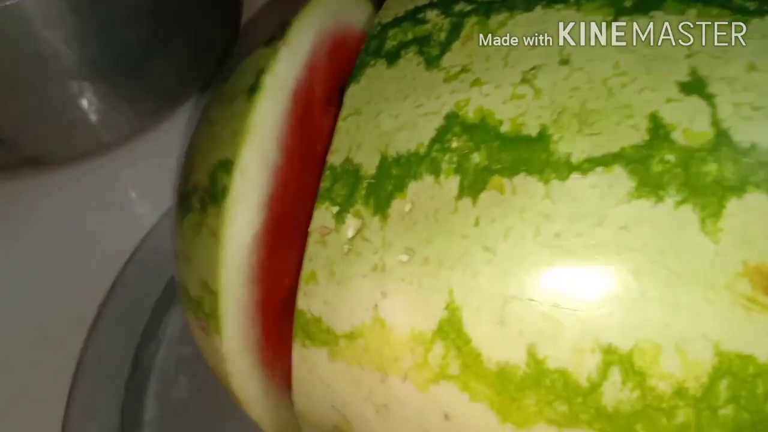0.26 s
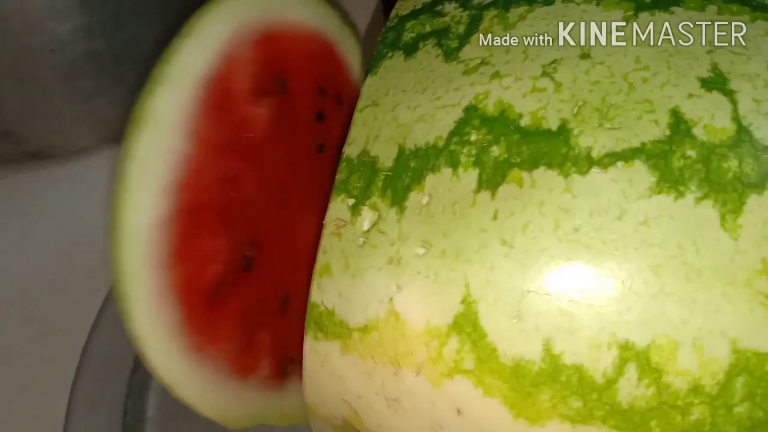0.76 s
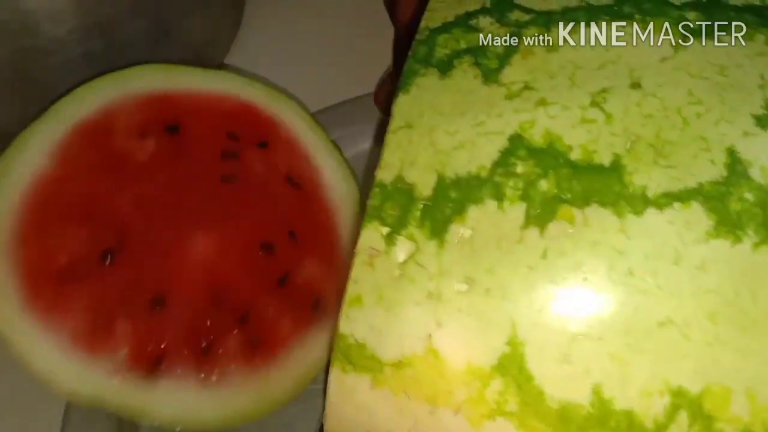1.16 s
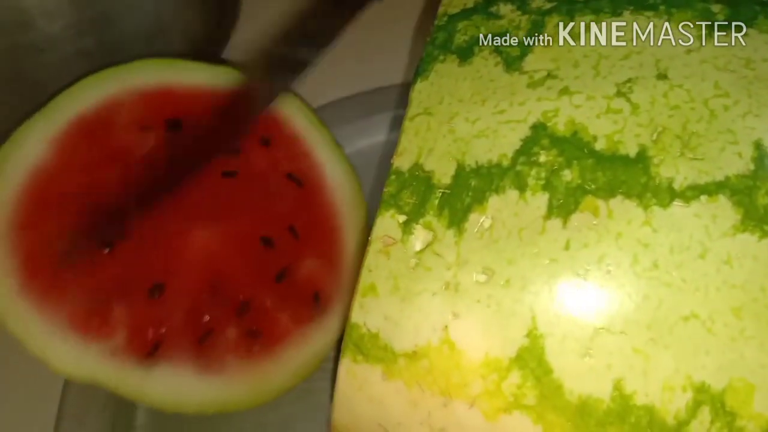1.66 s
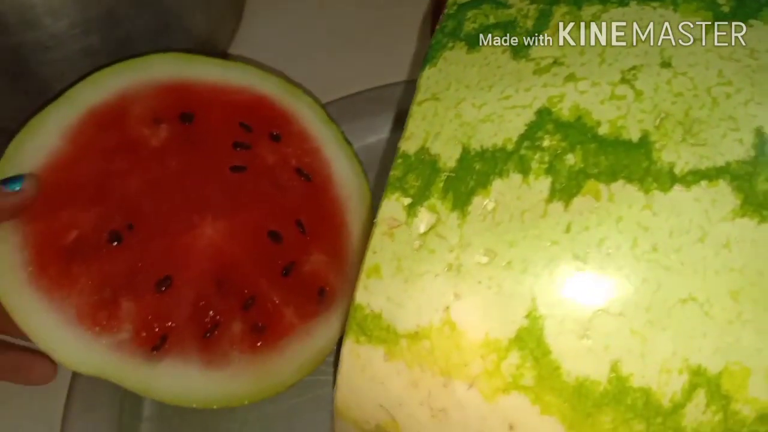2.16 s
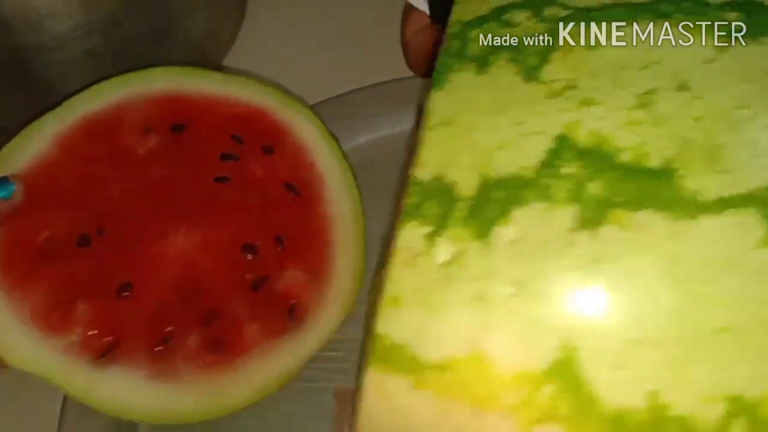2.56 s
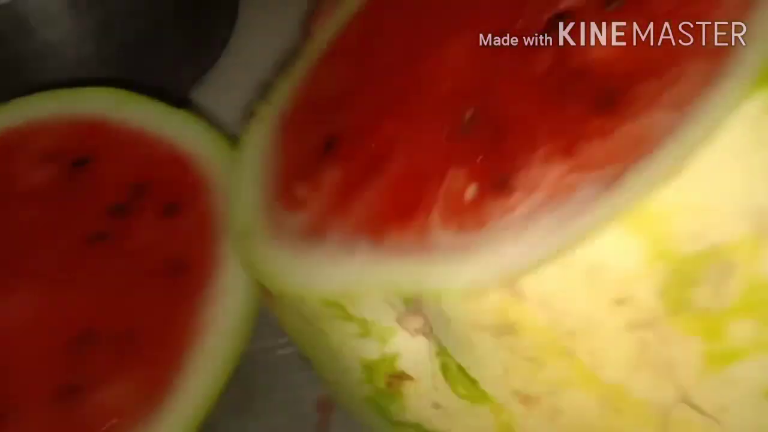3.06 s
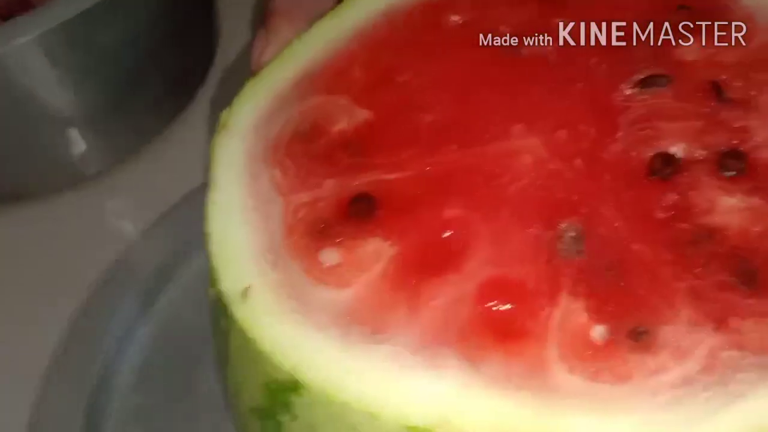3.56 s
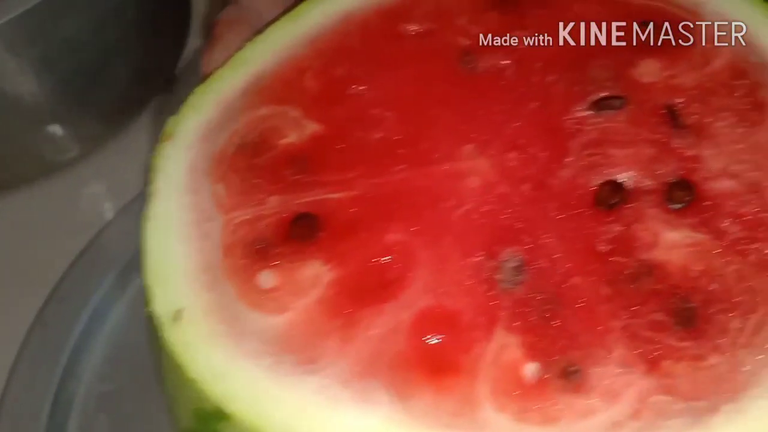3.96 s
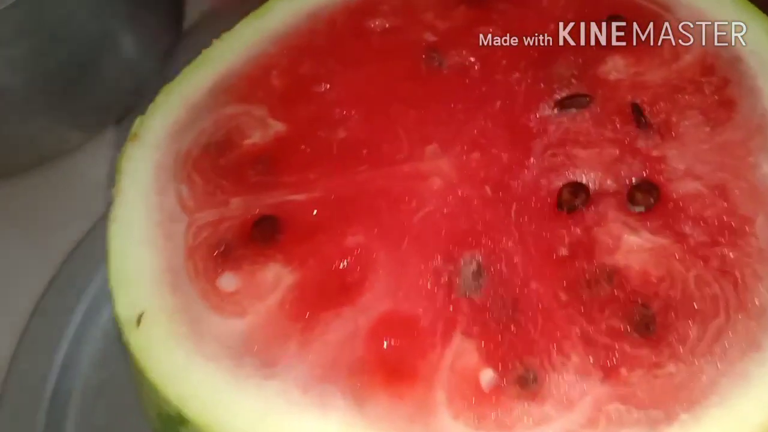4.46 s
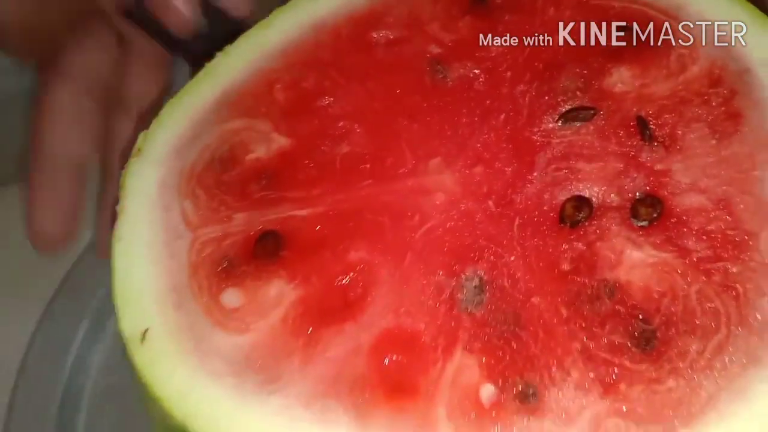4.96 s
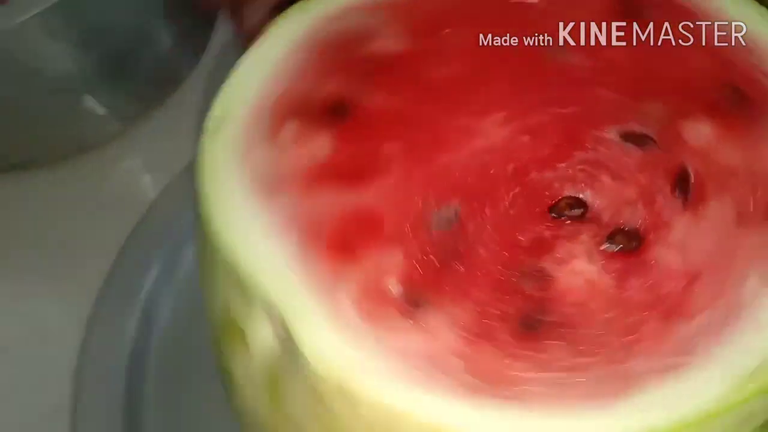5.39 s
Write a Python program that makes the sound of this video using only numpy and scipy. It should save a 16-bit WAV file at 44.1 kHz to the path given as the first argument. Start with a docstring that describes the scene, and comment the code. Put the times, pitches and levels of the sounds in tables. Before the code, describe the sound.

A close phone view of a watermelon on a steel tray in a small reflective kitchen, with low room air beneath. From 0 to 0.9 s hands rub the wet rind with faint squeaks and squelches while fibres part in crisp, juicy snaps, in bursts around 0.2 s and from 0.55 to 0.9 s. At about 0.95 s the slice topples onto the tray, the hardest clank at 1.02 s with a short thud. Soft rubbing, weak taps near 1.4 s and a faint hiss follow. From about 2.15 to 2.95 s the melon slides with a strong nasal rasp near 2 kHz, fading while growing grittier as it tips. Between 3.43 and 3.71 s the tray clatters in quick knocks with a dull, hollow bump. Afterwards it is quiet: light rubs, tiny squeaks, two faint hum swells around 4.3 and 4.8 s, and delicate taps at 5.0 and 5.4 to 5.6 s.

```python
"""Hands rub a wet watermelon while fibres snap; a slice peels off and topples onto a steel tray.
A faint hiss near 2 kHz lingers, then the melon slides with a rasp and tips onto its edge; the tray clatters.
Rubs, squeaks and two swells of a faint hum follow, then a few light taps; a phone listens from close by.
Fibres, rubs and rasp are shaped noise; a knock is noise, damped modes and a thud, with a diffuse kitchen tail."""
import sys
import numpy as np
from scipy import signal
from scipy.fft import rfft, irfft, next_fast_len
from scipy.io import wavfile
from scipy.ndimage import uniform_filter1d, map_coordinates

SR = 44100
rng = np.random.default_rng(int(sys.argv[2]) if len(sys.argv) > 2 else 0)


def int16_out(signal):
    """Quantize to a 16-bit WAV file."""
    q = np.round(np.clip(np.atleast_2d(signal).T, -1, 1) * 32767)
    wavfile.write(sys.argv[1], SR, q.astype(np.int16))


N = 248283

# Levels are relative unless stated.
# still air: f/Hz, level/dB
AIR_SPECTRUM = [(12, 3), (20, 15.5), (30, -16.5), (49, -10), (130, -7), (285, -12.5), (328, -13),
                (642, -12), (1260, -19), (2600, -16.5), (3440, -24.5), (5230, -21.5), (9950, -66),
                (13500, -35), (16000, -59)]
# faint wavering hum: start/s, end/s, f/Hz, level/dB (f and level are centres)
HUM_SWELLS = [(4.278, 4.417, 637, -62), (4.693, 4.857, 633, -59)]
# decay of the hard-walled kitchen: f/Hz, t60/s
KITCHEN_DECAY = [(100, 0.36), (400, 0.52), (1200, 0.37), (2500, 0.47), (5000, 0.41), (9000, 0.37),
                 (15000, 0.24)]
# likeness of left and right: f/Hz, correlation (1 = alike)
PORT_LIKENESS = [(60, 0.94), (250, 0.93), (600, 0.46), (1500, 0.057), (6000, 0.12)]
# level difference of the phone's ports: f/Hz, left minus right/dB
PORT_BALANCE = [(100, 1), (400, 1), (1250, 1), (2400, 3.5), (4400, 3.5), (8100, 8), (15000, 1)]
# place of tray and drag sounds, interpolated: t/s, left delay/ms, left minus right/dB
PLACES = [(1.4, .3, 0), (3.4, 0.077, -0.5)]
LOW_CUT_HZ, TOP_HZ = 47, 15900

# hands rub the rind: start/s, end/s, level/dB, hiss against it/dB
HAND_RUBS = [(0.037, 0.233, -62.5, -13.5), (0.402, 0.615, -60, -17), (0.818, .95, -63, -16),
             (1.262, 1.422, -49.5, -3), (2.963, 3.176, -59, -42), (3.287, 3.443, -62.5, -25),
             (3.85, 3.957, -69.5, -5.5), (4.153, 4.285, -61.5, -10), (4.381, 4.722, -72.5, -5.5),
             (4.835, 4.945, -65.5, -7), (5.09, 5.62, -66.5, -5.5)]
# dry rustle, wet squish, treble hiss: f/Hz, level/dB
RUB_SPECTRUM = [(350, -29), (600, -3), (636, -21.5), (675, -3), (887, -3), (948, -3), (1040, -5.5),
                (1220, 0), (1430, -7), (2220, 2), (3500, -8), (4550, -45), (7700, -120)]
SQUISH_SPECTRUM = [(2500, -47.5), (3600, -2.5), (5000, -1.5), (6500, -5.5), (8500, -18)]
HISS_SPECTRUM = [(6000, -6), (8200, 3), (10000, -6.5), (12000, -1), (14500, 0.5), (15600, -22)]
# the fruit's weight shifts on the tray: start/s, end/s, level/dB
WEIGHT_SHIFTS = [(0, 0.237, -61), (0.698, 1.617, -66), (2.966, 3.552, -60), (4.444, 4.9, -68.5)]
RUB_ATTACK_S, RUB_RELEASE_S = 0.15, 0.1566
RUB_DB, SQUISH_DB = 6, 0.5  # dry and wet part, against the press
# faint steady treble hiss while the slice lands and after
HISS_START_S, HISS_END_S, HISS_LOWER_DB, HISS_UPPER_DB = 0.81, 2.024, -57, -59

# soft bumps of the heavy fruit: t/s, level/dB, f/Hz, t60/s
FRUIT_BUMPS = [(1.186, -47, 313, 0.2), (3.3, -49, 115, 0.27), (3.426, -43, 227, 0.12),
               (3.635, -34, 349, 0.34), (5.095, -43.5, 229, 0.068), (5.41, -49, 408, 0.3)]
# slips of wet rind: t/s, length/s, f/Hz, width as a fraction of f, level/dB
RIND_SQUEAKS = [(0.033, 0.062, 1180, 0.017, -55.5), (0.034, 0.066, 2400, 0.7, -54.5),
                (0.272, 0.051, 2670, 1, -52.5), (0.356, 0.041, 2460, 0.63, -55),
                (.395, 0.063, 2640, 1, -50), (0.485, 0.029, 1410, 0.19, -53.5),
                (0.558, 0.052, 2070, 0.45, -48), (2.134, 0.11, 920, 0.075, -52.5),
                (4.128, 0.12, 976, 0.013, -66), (4.404, .08, 574, .07, -64.5),
                (4.499, 0.26, 433, 0.066, -62.5)]

# faint hiss near 2 kHz, then the slide: start/s, end/s, level at start/dB, sag/(dB/s), first f/Hz, last f/Hz
DRAG_PUSHES = [(1.45, 2.06, -55.5, 5, 2220, 2060), (2.245, 2.87, -33, 12, 1953, 2123)]
# rasp resonances, lower and upper: multiple of the centre f, width/Hz, level/dB
RASP_LOWER = [(1, 274, 18), (1.22, 420, 11.5), (1.55, 240, -17)]
RASP_UPPER = [(2.09, 530, -9), (2.28, 516, -7), (3.15, 402, -22.5)]
# rind grit; scrape of the loaded sheet: f/Hz, level/dB
GRIT_SPECTRUM = [(3060, -16), (5200, 6.5), (5960, -2), (8480, -7.5), (9720, -15), (13700, -11),
                 (15600, -22), (16000, -69.5)]
SCRAPE_SPECTRUM = [(250, -22), (420, -3.5), (620, -6.5), (850, -12.5), (1100, -6.5), (1320, -2),
                   (1480, -7.5), (1800, -9.5), (2300, -32)]
DRAG_ATTACK_S, DRAG_RELEASE_S = 0.13, 0.11
WAVER_HZ = 61  # wander of the resonances with the grip, before smoothing
UPPER_DB, GRIT_DB, SCRAPE_DB = -9, -20, -20.5  # against the lower rasp, melon flat
LOAD_WIDTH_HZ = 22  # widening of the sheet's resonances under the sliding fruit
TIP_S, TIPPING_S = 2.492, 0.12  # midpoint and time scale of tipping onto the edge
TIP_UPPER_DB, TIP_GRIT_DB, TIP_SCRAPE_DB = 1.5, 11.5, 13.5  # added by tipping

# thickest wet fibres snap: t/s, level/dB, body/dB
THICK_SNAPS = [(.154, -31, 0), (.178, -35, 11.5), (0.1835, -29.5, -8), (0.2103, -30.5, -4),
               (0.226, -31.5, -5), (.5622, -35, -1), (.586, -32.5, -12), (0.6019, -31.5, 5),
               (0.6395, -32.5, 5.5), (0.7558, -28.5, 4.5), (0.7831, -23, -28.5), (0.7985, -32, -8),
               (0.8079, -27.5, -7), (0.8453, -25, -4.5), (0.8637, -30.5, -4), (0.8854, -30, -1),
               (.895, -28.5, -15.5)]
# thin fibres part at random: start/s, end/s, median level/dB
THIN_PULLS = [(0.111, .23, -48), (.57, .64, -33), (0.848, 0.938, -32.5)]
# bright tick and dull flesh pop of a fibre: f/Hz, level/dB
WET_SPECTRUM = [(1470, -16.5), (2500, -6), (2790, -12), (3860, -14.5), (5230, -5.5), (6500, -20),
                (10700, -27), (13800, -23.5), (16000, -30)]
FLESH_SPECTRUM = [(300, -25), (700, -4), (1100, -3.5), (2400, -2.5), (3500, -9), (5000, -31.5)]
FIBRES_PER_S, FIBRE_SCATTER_DB, FIBRE_BODY_DB = 46, 4.5, 2.5

# knocks on the tray: t/s, level/dB, treble/dB, rim ring/dB
TRAY_KNOCKS = [(0.9442, -31.5, -24, -18), (0.9527, -12, -3, -27), (0.9722, -15.5, 5, -26),
               (1.008, -33, 13, -5), (1.018, 3, 0.5, -17), (1.191, -37, -18, -35), (1.357, -34, -13, -17),
               (1.388, -33.5, -9, -16), (1.418, -33.5, 10, -16), (3.428, -42, -27.5, -28),
               (3.4449, -14, -1.5, -32), (3.4569, -8.5, -8, -37), (3.578, -6, -7.5, -28.5),
               (3.633, -12, -1, -24), (3.6452, -12.5, 5.5, -32), (3.6748, -14, -2.5, -30),
               (3.687, -16.5, -10.5, -35), (3.71, -35, -13.5, -25), (4.9712, -50, -2, -24),
               (5.4093, -37.5, 1.5, -30), (5.555, -49, 3, -7), (5.6127, -41.5, 10, 15.5),
               (5.625, -37.5, -12, 14)]
# loaded sheet: f/Hz, width/Hz, level/dB
SHEET_MODES = [(728.4, 22, -9.5), (931, 17, -5), (1139, 16, 6), (1279, 7.4, -7.5), (1323, 14, -14),
               (1485, 40, 4.5), (1600, 80, 7.5), (1920, 77, -6), (1980, 55, -5), (2095, 32, 6),
               (2287, 77, 5), (2412, 48, 4), (2695, 17, -15.5), (2925, 17, -16.5), (2780, 12, 9.5),
               (3125, 23, -1), (4116, 190, -11.5), (4000, 93, -21.5), (4980, 39, -9.5), (5040, 40, -7.5),
               (5800, 68, -8.5), (6100, 33, -9)]
# free rim: f/Hz, level/dB, t60/s before the fruit's damping
RIM_MODES = [(1015, -14.5, 0.54), (1198, -3, 0.13), (1260, -10.5, 0.39), (2010, -20.5, 0.46),
             (2090, -2, 0.24), (2288, -16, 0.42), (2820, -5, 0.33), (2657, 4, 0.6), (2695, -13.5, 0.26),
             (2675, 0.5, 0.24), (3100, -7.5, 0.43), (4170, -8.5, .26), (4490, -17.5, 0.61),
             (4550, -16, .42), (5150, -17.5, 0.44), (5185, -16.5, .4)]
# dense clatter: f/Hz, level/dB
CLANG_SPECTRUM = [(250, -49.5), (420, -32.5), (727, -7.5), (846, -9), (927, -6.5), (1220, -1.5),
                  (1760, -3.5), (2350, -2), (3140, -8), (3330, -14), (5030, -10), (9680, -31.5),
                  (14200, -29), (16000, -51)]
# counter: f/Hz, level/dB, t60/s before the flesh's damping
COUNTER_MODES = [(81.5, -6.5, 0.075), (120, -5, 0.062), (155, -7.5, 0.044)]
# the fruit's hollow body: f/Hz, level/dB
HOLLOW_SPECTRUM = [(120, -26), (200, -1.5), (260, -3.5), (340, -1.5), (430, -4), (700, -29)]
REBOUND_S, REBOUND_DB, REBOUND_TREBLE_DB = .0044, -5.5, -1.5  # second contact, against the first
CLATTER_T60_S, CLATTER_DOUBLES_DB = 0.068, 38  # t60 at 0 dB; doubles for a knock this much softer
SLICE_DOWN_S = 1.25  # knocks before: slice landing; after: melon rocking the tray and light taps
SLICE_THUD_DB, LATER_THUD_DB = -10.5, -32  # for a 0 dB knock, before the port split
THUD_DB_PER_DB, THUD_DAMPING_T60_S = 1.6, 0.088  # growth with the knock; damping by soft flesh
RIM_DAMPING_T60_S = 1.5  # added by the wet fruit
HOLLOW_DB = -33.5


def amp(db):
    """Decibels to gain."""
    return 10 ** (np.asarray(db) / 20)


def unit(x):
    """Scale to rms 1."""
    return x / np.sqrt(np.mean(x ** 2) + 1e-20)


def along(points, hz):
    """Interpolate (f/Hz, value) points on a log frequency axis."""
    f, v = np.transpose(points)
    return np.interp(np.log(hz + 1), np.log(f + 1), v)


def colour(points):
    """Gain response of a (f/Hz, level/dB) spectrum."""
    return lambda hz: amp(along(points, hz))


def wobble(knots_per_s):
    """Smooth random curve through normal knots."""
    return map_coordinates(rng.standard_normal(int(N * knots_per_s / SR) + 4),
                           [np.arange(N) * knots_per_s / SR])


def dying(t, t60):
    """Exponential decay, -60 dB after t60."""
    return np.exp(-np.log(1000) * t / t60)


def stroke(start_s, end_s, attack_s, release_s):
    """Squared ramp envelope: full from start to end, attack before, release after."""
    end_s = max(start_s, end_s)
    knots_s = [start_s - attack_s, start_s, end_s, end_s + release_s]
    return np.interp(np.arange(N) / SR, knots_s, [0, 1, 1, 0]) ** 2


def filtered(x, response):
    """Apply a response of frequency, zero-padded."""
    size = x.shape[-1]
    m = next_fast_len(size + 8192)
    return irfft(rfft(x, m) * response(np.fft.rfftfreq(m, 1 / SR)), m)[..., :size]


def noise(response, size=N):
    """Shaped stereo noise of rms 1; mid and side shares set the left-right likeness."""
    def mid_side(hz):
        angle = np.arccos(np.clip(along(PORT_LIKENESS, hz), -1, 1)) / 2
        return response(hz) * np.array([np.cos(angle), np.sin(angle)])
    mid, side = filtered(rng.standard_normal((2, size)), mid_side)
    return unit(np.array([mid + side, mid - side]))


def gliding(resonances, centre_hz):
    """Noise of rms 1 in resonances that follow a smoothed moving centre."""
    hz, t, z = signal.stft(noise(np.ones_like), SR, nperseg=512)
    centre = np.interp(t, np.arange(N) / SR, uniform_filter1d(centre_hz, size=5000))
    power = sum(amp(db) ** 2 / (1 + (2 * (hz[:, None] - multiple * centre) / width_hz) ** 2) ** 2
                for multiple, width_hz, db in resonances)
    return unit(signal.istft(z * np.sqrt(power), SR, nperseg=512)[1][:, :N])


def decaying(peaks, stretch):
    """(f, width, level) resonances as (f, level, t60) modes: narrow ones ring longer."""
    return [(hz, db + 10 * np.log10(width_hz), stretch * np.log(1000) / np.pi / width_hz)
            for hz, width_hz, db in peaks]


def ringing(modes, t, scatter_db, spread):
    """Damped modes, total power normalised, with random strengths and port phases (spread in rad)."""
    hz, db, t60 = np.transpose(modes)
    gain = amp(db + scatter_db * rng.standard_normal(len(hz)))
    common = 2 * np.pi * rng.random(len(hz))
    phases = np.exp(1j * (common + spread * rng.standard_normal((2, len(hz)))))
    waves = np.exp((2j * np.pi * hz - np.log(1000) / t60)[:, None] * t)
    return np.sqrt(2) * ((phases * gain / np.linalg.norm(gain)) @ waves).real


def add(track, s, sound):
    """Mix a sound into a track at time s."""
    start = max(round(s * SR), 0)
    part = sound[:, :max(N - start, 0)]
    track[:, start:start + part.shape[1]] += part


def placed(x, s):
    """Offset the ports in time and level by the source's place at time s."""
    times_s, lags_ms, sides_db = np.transpose(PLACES)
    lag_s = np.interp(s, times_s, lags_ms) / 1000
    side_db = np.interp(s, times_s, sides_db)
    half = np.array([[.5], [-.5]])
    return filtered(x, lambda hz: amp(half * side_db) * np.exp(-2j * np.pi * hz * half * lag_s))


def kitchen(x, wet_db, delay_s=0.0042, build_s=0.0057):
    """Hard walls answer with a fresh diffuse tail, its decay set by frequency."""
    hz, t, z = signal.stft(noise(np.ones_like, size=int(SR * .7)), SR, nperseg=256)
    decay = dying(t, along(KITCHEN_DECAY, hz)[:, None])
    tail = signal.istft(z * decay, SR, nperseg=256)[1]
    tail = tail * np.clip((np.arange(tail.shape[1]) / SR - delay_s) / build_s, 0, 1)
    answer = signal.fftconvolve(x, tail / np.linalg.norm(tail[0]), axes=1)
    return np.pad(x, ((0, 0), (0, tail.shape[1] - 1))) + amp(wet_db) * answer


def room_tone():
    """Still air as shaped noise, a low narrow-band drone and a wavering sine hum."""
    hum = 0
    for start_s, end_s, hum_hz, db in HUM_SWELLS:
        swell = amp(db + 1.5 * wobble(14)) * stroke(start_s, end_s, attack_s=0.076, release_s=0.3)
        hum = hum + swell * np.sin(2 * np.pi * np.cumsum(hum_hz + 6 * wobble(30)) / SR)
    drone = noise(lambda hz: 1 / (1 + ((hz - 132) / 7) ** 2))
    return amp(-54.5) * noise(colour(AIR_SPECTRUM)) + amp(-69) * drone + hum


def hands():
    """Fingers rustle in grains on wet rind, with a faint treble hiss; shifting weight rumbles softly."""
    pressure, rub_hiss = np.zeros(N), np.zeros(N)
    for start_s, end_s, db, hiss_db in HAND_RUBS:
        press = amp(db) * stroke(start_s, end_s, RUB_ATTACK_S, RUB_RELEASE_S)
        pressure += press
        rub_hiss += amp(hiss_db) * press
    steady = stroke(HISS_START_S, HISS_END_S, attack_s=0.201, release_s=0.18)
    squish_level = np.hypot(amp(SQUISH_DB) * pressure, amp(HISS_LOWER_DB) * steady)
    hiss_level = np.hypot(rub_hiss, amp(HISS_UPPER_DB) * steady)
    rub = amp(RUB_DB) * pressure * noise(colour(RUB_SPECTRUM))
    squish = squish_level * noise(colour(SQUISH_SPECTRUM))
    hiss = hiss_level * noise(colour(HISS_SPECTRUM))
    grain = unit(amp(1.1 * wobble(590) + 1.0 * wobble(38)))
    weight = sum(amp(db) * stroke(start_s, end_s, attack_s=0.6, release_s=0.51)
                 for start_s, end_s, db in WEIGHT_SHIFTS)
    rumble = noise(colour([(150, -18), (330, 14.0), (470, 12.0), (650, 11), (1100, -48.5)]))
    return (rub + squish + hiss) * grain + weight * rumble


def bumps():
    """Heavy fruit meets hand or tray softly: a low damped note over a dull puff."""
    out, t = np.zeros((2, N)), np.arange(SR) / SR
    for s, db, note_hz, t60 in FRUIT_BUMPS:
        note = np.sin(2 * np.pi * note_hz * t) * dying(t, t60)
        band = noise(lambda hz: 1 / (1 + ((hz - note_hz) / 70) ** 4), size=len(t))
        puff = amp(-2.5) * band * dying(t, 0.14)
        add(out, s, amp(db) * (note + puff) * (1 - np.exp(-t / 0.0042)))
    return out


def squeaks():
    """Wet rind slips briefly: narrow noise has a fuzzy pitch, broad noise is a squelch."""
    out = np.zeros((2, N))
    for s, length_s, pitch_hz, width, db in RIND_SQUEAKS:
        swell = np.hanning(int(length_s * SR))
        slip = noise(lambda hz: 1 / (1 + ((hz / pitch_hz - 1) / width) ** 2), size=len(swell))
        add(out, s, amp(db + 3.0) * swell * slip)
    return out * unit(amp(0.86 * wobble(430)))


def drag():
    """After a faint hiss, rind slips over steel in tiny jerks; resonances glide, grit grows with tipping."""
    t = np.arange(N) / SR
    push = sum(amp(db - sag_db_per_s * (t - start_s))
               * stroke(start_s, end_s, DRAG_ATTACK_S, DRAG_RELEASE_S)
               for start_s, end_s, db, sag_db_per_s, *_ in DRAG_PUSHES)
    glide_s = np.ravel([row[:2] for row in DRAG_PUSHES])
    glide_hz = np.ravel([row[-2:] for row in DRAG_PUSHES])
    centre_hz = np.interp(t, glide_s, glide_hz)
    tipped = (1 + np.tanh((t - TIP_S) / TIPPING_S)) / 2

    lower = gliding(RASP_LOWER, centre_hz + WAVER_HZ * wobble(16))
    upper = gliding(RASP_UPPER, centre_hz + WAVER_HZ * wobble(16))
    rasp = lower + amp(UPPER_DB + TIP_UPPER_DB * tipped) * upper
    grit = noise(colour(GRIT_SPECTRUM)) + amp(1.5) * noise(lambda hz: 1 / (1 + ((hz - 3250) / 350) ** 2))

    def sheet(hz):
        """Equal-height sheet resonances over a floor, widened, so more damped, by the fruit's weight."""
        return .5 + sum(1 / (1 + (2 * (hz - mode_hz) / (width_hz + LOAD_WIDTH_HZ)) ** 2)
                        for mode_hz, width_hz, _ in SHEET_MODES)
    scrape = noise(lambda hz: colour(SCRAPE_SPECTRUM)(hz) * sheet(hz))

    sound = rasp + amp(GRIT_DB + TIP_GRIT_DB * tipped) * grit
    sound = sound + amp(SCRAPE_DB + TIP_SCRAPE_DB * tipped) * scrape
    slips = unit(amp(1.17 * wobble(420) + 0.7 * wobble(90)))
    return kitchen(placed(sound * slips * push, DRAG_PUSHES[0][0]), wet_db=-2)[:, :N]


def peeling():
    """Juicy fibres part one by one: a bright tick and crack over a duller pop of flesh."""
    out, t = np.zeros((2, N)), np.arange(SR // 20) / SR
    thin = []
    for start_s, end_s, db in THIN_PULLS:
        for s in np.arange(start_s, end_s, 1 / FIBRES_PER_S):
            fibre_db = db + FIBRE_SCATTER_DB * rng.standard_normal()
            thin.append((s + rng.random() / FIBRES_PER_S, fibre_db, FIBRE_BODY_DB))
    for s, db, body_db in THICK_SNAPS + thin:
        tick = noise(colour(WET_SPECTRUM), size=len(t)) * dying(t, 0.019)
        pop = amp(body_db - 12) * noise(colour(FLESH_SPECTRUM), size=len(t)) * dying(t, 0.041)
        crack = amp(-18) * noise(np.ones_like, size=len(t)) * dying(t, 0.0041)
        add(out, s, amp(db - 2.5) * (tick + pop + crack) * (1 - np.exp(-t / 0.00016)))
    return kitchen(out, wet_db=-10.0)[:, :N]


def contact(t, db, treble_db, rim_db):
    """One touch on the tray: dense clatter, damped sheet modes, rim ring, crack and hollow fruit note."""
    def hardness(hz):
        """A harder contact lifts the top of the spectrum."""
        return colour(CLANG_SPECTRUM)(hz) * amp(treble_db * hz ** 2 / (hz ** 2 + 3500 ** 2))
    clatter_t60_s = CLATTER_T60_S * 2 ** (-db / CLATTER_DOUBLES_DB)
    clatter = amp(0.5) * noise(hardness, size=len(t)) * dying(t, clatter_t60_s)
    sheet = amp(-4) * ringing(decaying(SHEET_MODES, stretch=1), t, scatter_db=2.5, spread=.7)
    rim = amp(rim_db - 9) * ringing(RIM_MODES, t, scatter_db=2, spread=.9) * dying(t, RIM_DAMPING_T60_S)
    crack = amp(treble_db - 21) * noise(np.ones_like, size=len(t)) * dying(t, 0.011)
    hollow = amp(HOLLOW_DB) * noise(colour(HOLLOW_SPECTRUM), size=len(t)) * dying(t, 0.27)
    return amp(db) * (clatter + sheet + rim + crack + hollow) * (1 - np.exp(-t / 0.00031))


def tray():
    """Each knock is a contact, a quick softer rebound and a damped thud through the counter."""
    out, t = np.zeros((2, N)), np.arange(SR // 2) / SR
    thud = sum(amp(db) * np.sin(2 * np.pi * hz * t) * dying(t, t60) for hz, db, t60 in COUNTER_MODES)
    thud = thud * (1 - np.exp(-t / 0.0028)) * dying(t, THUD_DAMPING_T60_S)
    port_gain = amp([[6], [-12]])  # left, right
    for s, db, treble_db, rim_db in TRAY_KNOCKS:
        for k in range(2):
            blow = contact(t, db + k * REBOUND_DB, treble_db + k * REBOUND_TREBLE_DB, rim_db)
            add(out, s + k * REBOUND_S, kitchen(placed(blow, s), wet_db=-12.5))
        thud_db = SLICE_THUD_DB if s < SLICE_DOWN_S else LATER_THUD_DB
        add(out, s, amp(THUD_DB_PER_DB * db + thud_db) * port_gain * thud)
    return out


def scene():
    """Sum of all sources, the left port louder, most of all in the treble."""
    sound = room_tone() + hands() + bumps() + squeaks() + drag() + peeling() + tray()
    half = np.array([[.5], [-.5]])
    return filtered(sound, lambda hz: amp(half * along(PORT_BALANCE, hz)))


def record(dry):
    """The phone ducks with the smoothed power, rounds off peaks and limits the band."""
    keep = np.exp(-1 / (0.023 * SR))  # 23 ms smoothing
    power = signal.lfilter([1 - keep], [1, -keep], np.mean(dry ** 2, axis=0))
    ducked = dry / np.sqrt(1 + power / amp(-12.5) ** 2)
    rounded = ducked / (1 + np.abs(ducked) ** 6) ** (1 / 6)
    return filtered(rounded, lambda hz: (hz < TOP_HZ) * hz ** 3 / (hz ** 3 + LOW_CUT_HZ ** 3))


dry = scene()
out = record(dry)
int16_out(out)
```